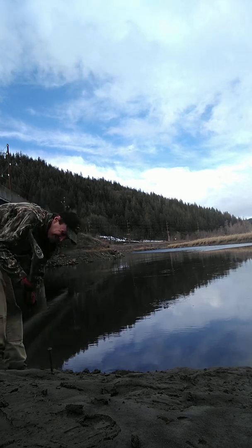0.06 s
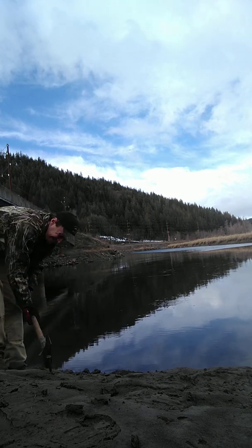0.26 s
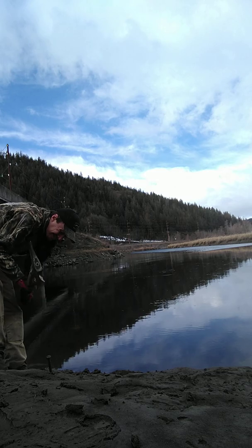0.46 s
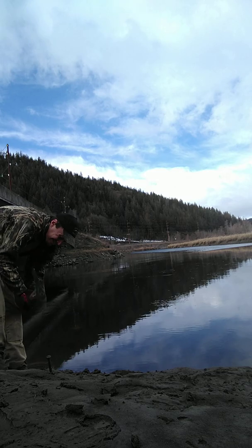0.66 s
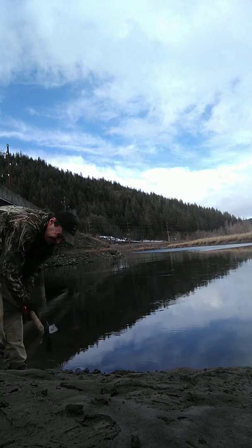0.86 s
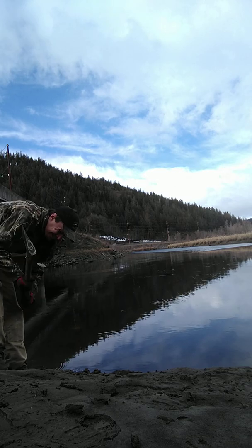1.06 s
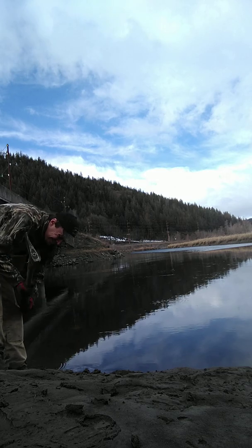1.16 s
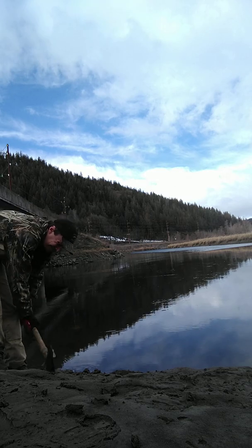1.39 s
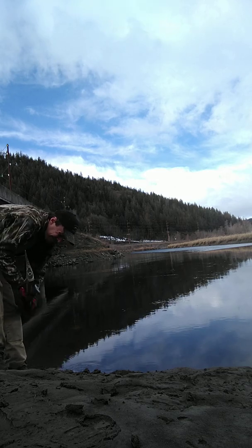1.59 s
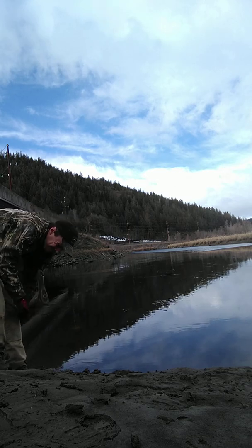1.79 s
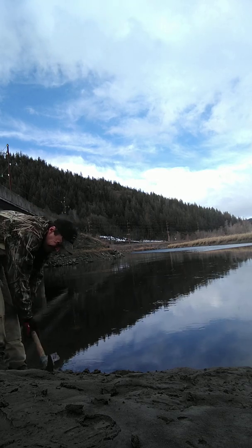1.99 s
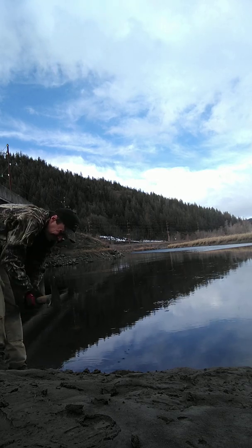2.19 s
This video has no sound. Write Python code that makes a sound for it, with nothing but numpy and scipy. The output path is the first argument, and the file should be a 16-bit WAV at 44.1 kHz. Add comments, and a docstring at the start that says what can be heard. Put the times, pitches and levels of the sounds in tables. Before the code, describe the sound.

A hammer hits a metal stake at about 0.2, 0.8, 1.35 and 1.9 seconds. Each blow is a blunt thud and bright crack with a short, damped metallic ring; the second rattles in quick rebounds and rings more clearly. Sharp slap echoes and a lumpy wash return from a bridge, with an earlier blow's tail fading at the start. Faint, low traffic drones far off.

```python
"""Hammering a stake under a bridge

A steel hammer drives a metal stake into a muddy riverbank under a road bridge, over far traffic.
Each contact is a blunt thud, a noisy crack and a short clatter that rings damped modes of stake and head.
The bridge answers with a row of sharp echoes and a lumpy, dying wash made from shaped noise bursts;
the wash of one earlier blow is still fading at the start. The road is a drone of drifting noise bands."""
import sys
import numpy as np
from scipy import signal
from scipy.fft import rfft, irfft, next_fast_len
from scipy.io import wavfile

SR = 44100
rng = np.random.default_rng(int(sys.argv[2]) if len(sys.argv) > 2 else 0)


def generate_wav(signal):
    """Clip the signal to [-1, 1] and save it as 16-bit WAV at the path in sys.argv[1]."""
    frames = np.transpose(np.atleast_2d(signal))
    scaled = np.clip(frames, -1, 1) * 32767
    pcm = np.round(scaled).astype(np.int16)
    wavfile.write(sys.argv[1], SR, pcm)


N = 99225
RUN_IN = SR // 2   # samples computed ahead of the start
SIDES = np.array([[.5], [-.5]])   # splits a left-minus-right level between left and right


def from_db(db):
    """Turn a level in dB into a gain."""
    return 10 ** (np.asarray(db) / 20)


def at_hz(points, hz, column=1):
    """Read a table column at any frequency, along a log-frequency axis."""
    table = np.array(points)
    return np.interp(np.log(np.maximum(hz, 1)), np.log(table[:, 0]), table[:, column])


def colour(x, points, share=1):
    """Equalise a sound with a share of a dB curve."""
    length = x.shape[-1]
    size = next_fast_len(length + 4096)
    gain = from_db(share * at_hz(points, np.fft.rfftfreq(size, 1 / SR)))
    return irfft(rfft(x, size) * gain, size)[..., :length]


def drift(rate_hz):
    """Smoothed noise that wanders with spread 1: computed every 40 samples, then interpolated."""
    step = 40
    r = np.exp(-2 * np.pi * rate_hz * step / SR)
    chance = rng.standard_normal(N // step + 2002)
    slow = signal.lfilter([1], [1, -2 * r, r * r], chance)[2000:]
    return np.interp(np.arange(N) / step, np.arange(len(slow)), slow / slow.std())


def bands():
    """Third-octave band-passes, each with its centre in Hz."""
    edges = 30 * 2 ** np.arange(0, 9.3, 1 / 3)
    return [(np.sqrt(low * high), signal.butter(2, [low, high], "band", fs=SR, output="sos"))
            for low, high in zip(edges, edges[1:])]


# The road's tone. Each row: frequency in Hz, relative density in dB per Hz.
TRAFFIC_COLOUR = [(30, -32), (70, -21), (97, -6.5), (232, -5.5), (351, -7.5), (432, -4), (695, -10),
                  (948, -2.5), (1800, -21), (2600, -26.5), (4200, -62), (5400, -75), (16000, -79.5)]
# The drone's slow swells. Each row: time in seconds, then relative levels in dB of rumble, low-mid, tyre roar.
DRONE_SWELLS = [(0.0, -48, -49.5, -46.5), (0.25, -52, -50.5, -48), (0.49, -51.5, -57, -45),
                (0.7, -53, -55.5, -49.5), (0.87, -50.5, -60.5, -51.5), (1.1, -53.5, -75.5, -54),
                (1.35, -54, -58, -52.5), (1.5, -55.5, -58.5, -49), (1.76, -55, -64, -55),
                (2.13, -54, -67.5, -55), (2.25, -52.5, -58.5, -56.5)]
# Where one drone layer hands over to the next: frequencies in Hz.
LAYER_EDGES = [290, 620]
# Stereo width of the road. Each row: frequency in Hz, left-right likeness from -1 to 1.
TRAFFIC_LIKENESS = [(60, 0.43), (130, 1), (290, 0.93), (640, 1), (1410, -0.79), (3100, 0.44), (6820, 0.03),
                    (15000, -0.02)]
# Stereo balance of the road. Each row: frequency in Hz, left minus right in dB.
TRAFFIC_BALANCE = [(60, 1.5), (180, -1), (550, -3), (1650, -15.5), (4970, -2.5), (15000, 3.5)]
PATCHY_DB = 1.3        # spread of each of the two drifts on a band
BAND_GAIN_DB = 17.5    # brings the summed bands up to the drone's level


def traffic():
    """Far road noise: noise bands side by side, in three layers on their own slow levels."""
    t = np.arange(N) / SR
    seconds, *layers_db = np.transpose(DRONE_SWELLS)
    white = rng.standard_normal((2, 2, N + RUN_IN))
    together = drift(1.0)
    road = 0
    for k, (hz, band) in enumerate(bands()):
        # neighbouring bands take turns with two noise pairs
        mid, side = signal.sosfilt(band, white[k % 2])[:, RUN_IN:]
        alike = np.clip(at_hz(TRAFFIC_LIKENESS, hz), -1, 1)
        layer_db = layers_db[np.searchsorted(LAYER_EDGES, hz)]
        level_db = np.interp(t, seconds, layer_db) + BAND_GAIN_DB + at_hz(TRAFFIC_COLOUR, hz)
        level_db = level_db + PATCHY_DB * (together + drift(2.7))
        gain = from_db(level_db + at_hz(TRAFFIC_BALANCE, hz) * SIDES)
        stereo = np.sqrt(1 + alike) * mid + np.sqrt(1 - alike) * side * [[1], [-1]]
        road = road + gain * stereo
    return road


def clatter(decay_s, t):
    """A dying run of uneven touches, cut off after two decay times, energy 1."""
    touches = rng.standard_normal(len(t)) * (t < 2 * decay_s) * np.exp(-t / decay_s)
    return touches / np.sqrt(np.sum(touches ** 2))


def ring(x, hz, t60):
    """A damped resonator: a unit click sets off a dying sine of height 1."""
    r, w = from_db(-60 / (t60 * SR)), 2 * np.pi * hz / SR
    return signal.lfilter([0, np.sin(w)], [1, -2 * r * np.cos(w), r * r], x + 1e-18)


def strike(touches, modes, db, share=1):
    """Excite a set of modes, each with its own chance strength; above 6 kHz the right may flip sign by chance."""
    mode_spread_db, side_spread_db = 1.5, 1.0
    out = 0
    for hz, level_db, t60 in modes:
        mode = ring(touches, hz, share * t60)
        chance = rng.standard_normal(4)
        spread_db = mode_spread_db * chance[0] + side_spread_db * chance[1:3, None]
        right_sign = np.sign(chance[3]) if hz > 6000 else 1
        gain = from_db(db + level_db + spread_db) * [[1], [right_sign]]
        out = out + mode / np.abs(mode).max() * gain
    return out


def thud(t, db):
    """The first touch: one blunt pulse from a heavily damped resonance."""
    pulse = ring(1. * (t == 0), 896, 0.0035)   # Hz, t60 in seconds
    return from_db(db) * pulse / pulse.max()


# Tone of the crack. Each row: frequency in Hz, level in dB.
CRACK_COLOUR = [(60, -50.5), (200, -16), (500, -5.5), (900, 0), (1400, 4.5), (2000, 2), (3200, -3),
                (5000, -18), (9000, -16.5), (16000, -30)]
CRACK_T60_S, CRACK_ALIKE = 0.038, 0.27   # fade time, share of noise power common to left and right


def crack(t, hold_s, db):
    """Noise of the contact: held for the clatter's length, then fading fast."""
    common, *apart = rng.standard_normal((3, len(t)))
    hiss = np.sqrt(CRACK_ALIKE) * common + np.sqrt(1 - CRACK_ALIKE) * np.array(apart)
    fade = from_db(-60 * np.maximum(t - hold_s, 0) / CRACK_T60_S)
    return from_db(db) * colour(hiss * fade, CRACK_COLOUR)


# The stake's main ring. Each mode: frequency in Hz, level in dB, t60 in seconds before the blow's damping share.
STAKE_MODES = [(2467.3, -5.5, 0.22), (2490.4, -0.5, 0.077), (3162, -11, 0.078), (1435, -9, 0.02),
               (1340, -20, 0.08), (1824, -20, 0.15)]


def stake_ring(touches, db, ring_share):
    """The stake's main modes, shortened by a share that each blow sets."""
    return strike(touches, STAKE_MODES, db, ring_share)


# The stake's upper ring. Each mode: frequency in Hz, level in dB, t60 in seconds before the later damping.
UPPER_MODES = [(4010, -3, 0.41), (4064, -5.5, 0.38)]
UPPER_HOLD_S, UPPER_DAMPED_T60_S = .041, .025
UPPER_LEFT_DB = -19   # a faint part sings on


def upper_ring(touches, t, db):
    """The stake's upper ring: free at first, then pulled down as the stake settles."""
    damping_db = -60 * np.maximum(t - UPPER_HOLD_S, 0) / UPPER_DAMPED_T60_S
    return strike(touches, UPPER_MODES, db) * from_db(np.maximum(damping_db, UPPER_LEFT_DB))


# The hammer head's ring. Each mode: frequency in Hz, level in dB, t60 in seconds.
HEAD_MODES = [(5394, 0, .22), (5394, -19, .7), (12700, -6, .16), (14720, -13, .1)]


def head_ring(touches, db):
    """The steel head's high modes, rung by the same clatter as the stake."""
    return strike(touches, HEAD_MODES, db)


def knock(touches, hz, db):
    """A single short resonance whose pitch each blow sets."""
    return strike(touches, [(hz, 0, .042)], db)   # t60 in seconds


GROUND_HZ, GROUND_T60_S, GROUND_LAG_S = 142, .07, .004


def ground(t, db):
    """The bank's low push: a dying sine that eases in after a short lag."""
    rise = np.clip((t - GROUND_LAG_S) * GROUND_HZ, 0, 1) ** 2
    return from_db(db - 60 * t / GROUND_T60_S) * np.sin(2 * np.pi * GROUND_HZ * t) * rise


# The stake's treble, also rung by the snap. Each mode: frequency in Hz, level in dB, t60 in seconds unshortened.
TREBLE_MODES = [(4050, -14.5, .045), (6360, -3.5, .035), (7620, -2.5, .04), (8050, -2, .025),
                (8550, -6, .006), (9700, -12, .035), (10670, -1, .025), (10980, -3, .03), (11930, -12, .03),
                (14390, -16, .018), (15460, -13, .018)]
# Tone of the snap's noise. Each row: frequency in Hz, level in dB.
SNAP_COLOUR = [(300, -10.5), (1200, 0), (4000, -2), (7000, 0), (11000, -3), (16000, -6)]
# The clack within the snap. Each mode: frequency in Hz, level in dB, t60 in seconds.
CLACK_MODES = [(3300, -5, .008), (3760, 0, .01), (4150, 0, .01)]
SNAP_DECAY_S, SNAP_T60_SHARE = 0.0027, 0.32


def snap_and_clack(t, snap_db, clack_db):
    """The first instant, flying sideways to the bridge: shortened treble modes and noise, plus a clack."""
    first = clatter(SNAP_DECAY_S, t)
    burst = rng.standard_normal(len(t)) * np.exp(-t / SNAP_DECAY_S)
    snap = strike(first, TREBLE_MODES, snap_db, SNAP_T60_SHARE)
    snap += from_db(snap_db) * colour(burst, SNAP_COLOUR)
    return snap, strike(first, CLACK_MODES, clack_db)


AIRBORNE_FROM_HZ = 258        # a thin stake radiates no bass
RING_TO_BRIDGE_DB = -7.5      # the ring follows the snap more weakly
STAKE_TO_BRIDGE_DB = -6.5     # an extra helping: the stake's main ring carries further than the rest
RING_IN_NEAR_ECHO_DB = -4.5   # the nearest echoes return mostly the snap
CLACK_FAR_DB = -9             # the clack reaches far surfaces more weakly


def contact(length, thud_db, crack_db, treble_db, snap_db, clack_db, knock_hz, knock_db,
            ground_db, stake_db, ring_share, upper_db, head_db):
    """One contact as stereo pairs: direct sound, sound toward near surfaces, sound toward far ones."""
    t = np.arange(SR // 2) / SR
    touches = clatter(length / 2, t)
    stake = stake_ring(touches, stake_db, ring_share)
    out = stake + strike(touches, TREBLE_MODES, treble_db) + head_ring(touches, head_db)
    out += upper_ring(touches, t, upper_db) + knock(touches, knock_hz, knock_db)
    out += thud(t, thud_db) + crack(t, length, crack_db)
    airborne = signal.butter(4, AIRBORNE_FROM_HZ, "high", fs=SR, output="sos")
    out = signal.sosfilt(airborne, out)
    snap, clack = snap_and_clack(t, snap_db, clack_db)
    ringing = from_db(RING_TO_BRIDGE_DB) * out + from_db(STAKE_TO_BRIDGE_DB) * stake
    to_near = snap + clack + from_db(RING_IN_NEAR_ECHO_DB) * ringing
    to_far = snap + from_db(CLACK_FAR_DB) * clack + ringing
    return np.vstack([out + ground(t, ground_db), to_near, to_far])


# The contacts of hammer and stake. Each row: start in seconds, clatter length in seconds, thud in dB,
# crack in dB, treble in dB, snap toward the bridge in dB, clack in dB, knock pitch in Hz, knock in dB,
# ground in dB, stake in dB, stake's ring time as a share, upper ring in dB, hammer head in dB.
CONTACTS = [(.2170, 0.011, -19, -12, -12.5, -8.5, -40, 358, -20.5, -29.5, -12, 0.6, -39, -42),
            (0.7761, 0.004, -11, -14.5, -20, -10, -20, 608, -24, -25.5, -16, 0.55, -17, -49),
            (0.7998, 0.0056, -15, -15, -18, -13, -28, 698, -28, -44, -15.5, 0.85, -33, -26),
            (0.8157, 0.0058, -20, -20, -32.5, -33.5, -35, 722, -26.5, -44.5, -20, 0.69, -41, -36.5),
            (1.3561, 0.004, -12, -17, -19.5, -12, -9.5, 796, -18, -21, -5.5, 0.36, -38.5, -41.5),
            (1.3644, 0.0051, -20, -23, -35, -35, -36, 684, -27, -45, -16, 0.7, -55.5, -52),
            (1.9248, 0.00375, -45, -56, -44, -44, -32.5, 446.2, -40, -45, -30.5, 0.46, -51, -53),
            (1.9322, 0.0075, -6, -8, -23.5, -17, -22.5, 743, -19, -17, -19.5, 0.45, -49, -26.5)]
EARLIER_BLOW_S = .36   # a blow this long before the start still washes on


def hammering():
    """All contacts in time, after a run-in that holds one earlier blow."""
    out = np.zeros((6, RUN_IN + N + SR))
    earlier = (-EARLIER_BLOW_S, *CONTACTS[0][1:])
    for start, *how in CONTACTS + [earlier]:
        i = RUN_IN + int(start * SR)
        out[:, i:i + SR // 2] += contact(*how)
    return out[:, :RUN_IN + N]


# Echoes off the bridge. Each row: delay in seconds, level in dB, left minus right in dB, smear in seconds.
BRIDGE_ECHOES = [(0.041, -13.5, 5.5, 0.00068), (0.046, -4, -7.5, 0.001), (.098, -24.5, -9.5, .003),
                 (0.147, -36.5, 25, 0.0034), (0.2, -32, -17.5, .005), (0.247, -33.5, -9.5, .005),
                 (0.2946, -24, -8.5, 0.0036), (0.349, -31.5, -5.5, 0.0044)]
# Tone of the nearest echoes. Each row: frequency in Hz, level in dB.
NEAR_COLOUR = [(300, -34.5), (1200, -17), (2600, -14.5), (3200, -4), (4500, -8.5), (6500, -1), (9000, -7),
               (10800, 1.5), (12500, -4), (16000, -4)]
# Tone of the far echoes. Each row: frequency in Hz, level in dB.
FAR_ECHO_COLOUR = [(300, 0), (1200, 2), (2500, -6), (4000, -8), (6500, -19.5), (11000, -26), (16000, -35)]
# The wash. Each row: frequency in Hz, level in dB, t60 in seconds.
WASH_BANDS = [(304, -35.5, 1), (1000, -37, 0.78), (2700, -38.5, 1.0), (3250, -37, 0.74), (4650, -34, 0.57),
              (8000, -32.5, 0.39), (12800, -36.5, .36), (15770, -39, .27)]
NEAR_S = .06         # echoes sooner than this count as near
FIRST_RETURN = 1.5   # weight of an echo's sharp front against its smear
WASH_START_S, WASH_RISE_S = 0.014, 0.037
WASH_LUMPS_DB, LUMP_RATE_HZ = 3, 44   # scattered surfaces make the wash lumpy


def echoes(t):
    """Near and far reflections: each a sharp front with a short smear of noise behind it."""
    near, far = np.zeros((2, 2, SR))
    for lag, db, pan_db, smear in BRIDGE_ECHOES:
        burst = rng.standard_normal((2, SR)) * (t >= lag) * np.exp(-np.abs(t - lag) / smear)
        burst[:, int(lag * SR) + 1] = FIRST_RETURN * np.sqrt(smear * SR)
        energy = np.sum(burst ** 2, axis=1, keepdims=True)
        burst = burst / np.sqrt(energy) * from_db(db + pan_db * SIDES)
        if lag < NEAR_S:
            near += burst
        else:
            far += burst
    return colour(near, NEAR_COLOUR), colour(far, FAR_ECHO_COLOUR)


def bridge_wash(t):
    """Dense late reflections: lumpy noise whose bands from 240 Hz up die at their own rates."""
    rise = np.clip((t - WASH_START_S) / WASH_RISE_S, 0, 1)
    lumps = from_db(WASH_LUMPS_DB * drift(LUMP_RATE_HZ)[:SR])
    white = rng.standard_normal((2, SR)) * rise * lumps
    wash = np.zeros((2, SR))
    for hz, band in bands()[9:]:
        fade_db = at_hz(WASH_BANDS, hz) - 60 * t / at_hz(WASH_BANDS, hz, column=2)
        wash += signal.sosfilt(band, white) * from_db(fade_db)
    return wash


def bridge():
    """Impulse responses of the place: the near echoes, then the far echoes with the wash."""
    t = np.arange(SR) / SR
    near, far = echoes(t)
    return near, far + bridge_wash(t)


# Stereo balance of the direct sound. Each row: frequency in Hz, left minus right in dB.
DIRECT_BALANCE = [(100, -1.5), (400, -1), (1000, -4.5), (2500, -12.5), (4500, 7), (9000, 5), (15000, 9)]


def scene():
    """Direct blows, the bridge's answer and the road, mixed."""
    road = traffic()
    heard, to_near, to_far = hammering().reshape(3, 2, -1)
    direct = np.array([colour(x, DIRECT_BALANCE, side) for x, side in zip(heard, SIDES[:, 0])])
    near, far = bridge()
    answer = signal.fftconvolve(to_near, near, axes=1) + signal.fftconvolve(to_far, far, axes=1)
    blows = direct + answer[:, :RUN_IN + N]
    return blows[:, RUN_IN:] + road


CEILING, CUTOFF_HZ = .95, 17000


def record(dry):
    """Round the peaks softly below a ceiling, then cut the top end steeply."""
    rounded = CEILING * np.tanh(dry / CEILING)
    return signal.sosfilt(signal.cheby2(12, 60, CUTOFF_HZ, fs=SR, output="sos"), rounded)


dry = scene()
out = record(dry)
generate_wav(out)
```